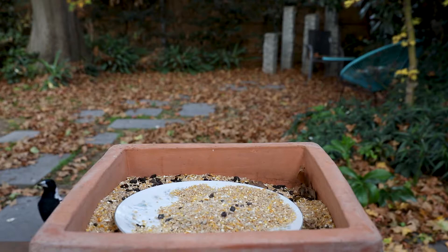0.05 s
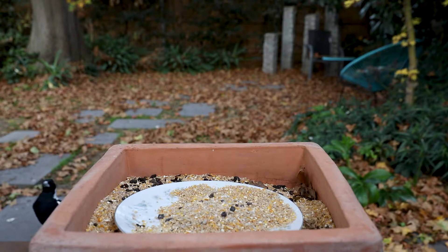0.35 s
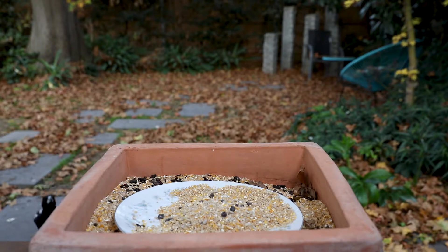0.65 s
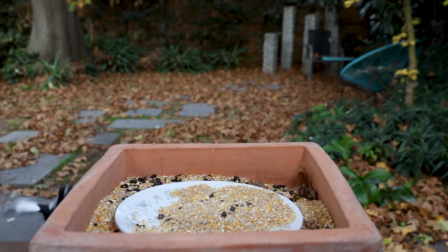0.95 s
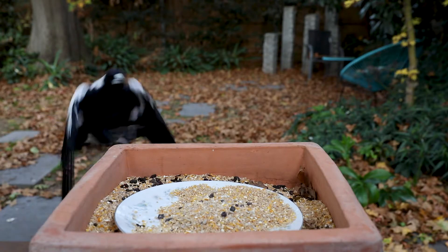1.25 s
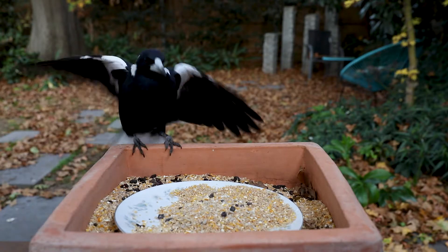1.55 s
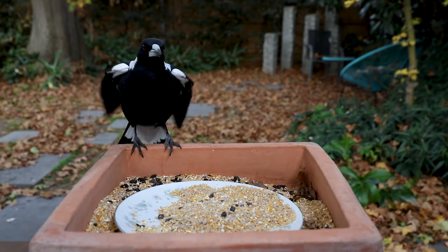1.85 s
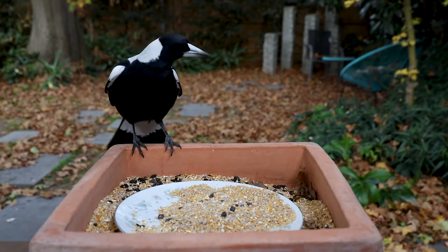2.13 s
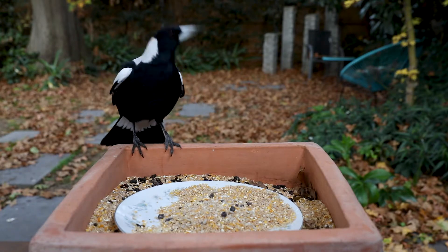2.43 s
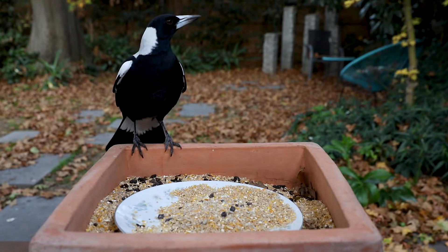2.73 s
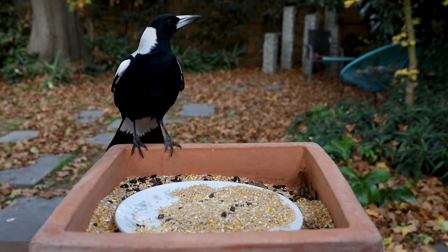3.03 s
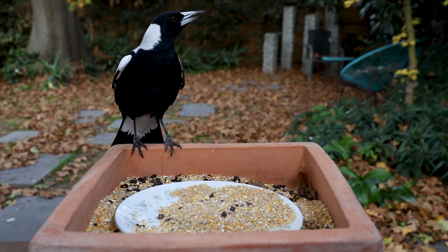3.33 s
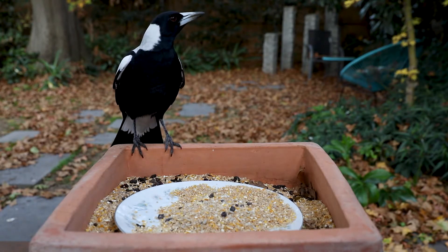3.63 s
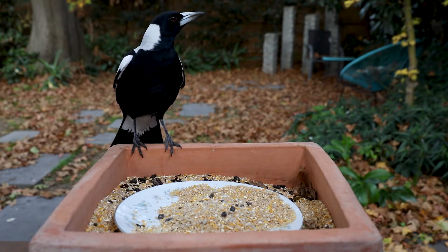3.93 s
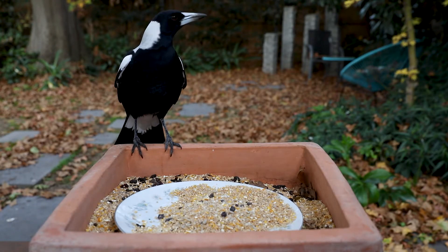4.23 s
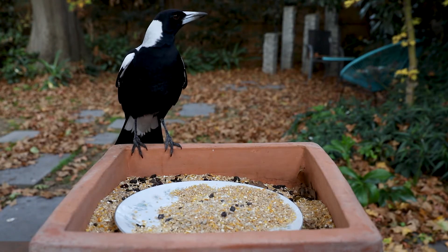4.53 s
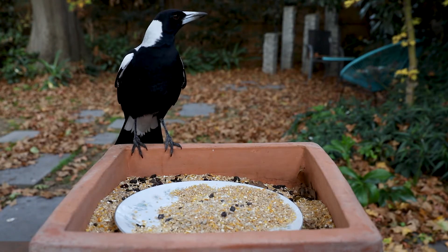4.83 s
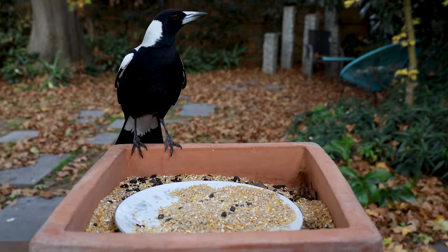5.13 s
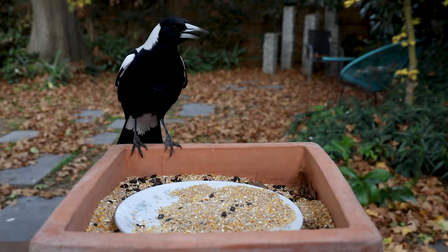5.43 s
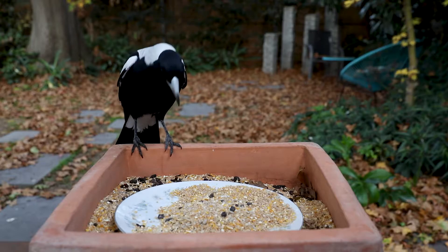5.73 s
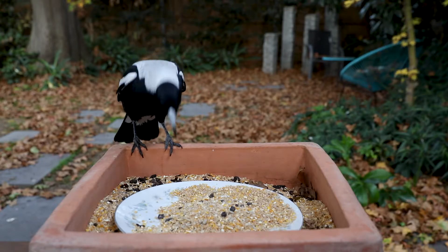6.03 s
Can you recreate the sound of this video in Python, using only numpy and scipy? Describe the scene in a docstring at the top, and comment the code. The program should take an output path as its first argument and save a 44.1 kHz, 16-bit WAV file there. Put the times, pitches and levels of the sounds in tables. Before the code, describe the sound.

A magpie calls in a quiet garden. Two softer, harsh squawks come first, each falling in pitch and ending in a short whistle, with faint wing swishes and claw scrapes between them. Louder squawks follow, a quick pair and then three in a row. Dry leaves rustle and a few dull knocks sound faintly in the gaps. The calls are fairly close, with a slight echo over a low outdoor hush.

```python
"""Magpie squawks, harsh and falling, some in quick pairs, at a seed tray in a leafy garden.
Each is a syrinx tone shaken by a fast flutter and shaped by throat and beak; it cracks, and the high
ones flip into a clean whistle. Wings swish as the bird flies up; claws and dry leaves scrape, with dull
knocks and two thin squeaks. Behind: one faint far hoot, garden wall echo, outdoor hush."""
import sys
import numpy as np
from scipy import signal
from scipy.fft import rfft, irfft, next_fast_len
from scipy.io import wavfile
from scipy.ndimage import uniform_filter1d, map_coordinates

SR = 44100
rng = np.random.default_rng(int(sys.argv[2]) if len(sys.argv) > 2 else 0)


def wrap_up_sound(samples):
    """Save the sound to the file named by the first command line argument, as 16-bit audio."""
    columns = np.atleast_2d(samples).T
    # keep every value between -1 and 1, then stretch to whole-number steps
    tamed = np.clip(columns, -1, 1)
    steps = np.round(tamed * 32767).astype(np.int16)
    wavfile.write(sys.argv[1], SR, steps)


N = 272538
TIME_S = np.arange(N) / SR

# (start [s], crack [s], end [s], first pitch [Hz], pre-crack pitch [Hz], cracked pitch [Hz],
#  flutter [Hz], crack roughness [0-1], windpipe echo [0-1], attack [s], level [dB], end fade [dB],
#  fundamental [dB], harsh treble [dB])
SQUAWKS = [(0.314, .459, .51, 1090, 976.4, 845, 159.4, 0.9, 0.05, .16, -27, -8, -8.5, -8),
           (1.672, 1.81, 1.858, 1084, 995, 872, 155.8, 0.92, 0.05, 0.24, -23.5, -6, -10, -10.5),
           (3.13, 3.298, 3.366, 903, 699, 668, 160.9, 0.46, 0.3, 0.073, -19.5, 13, -13, -11),
           (3.443, 3.576, 3.614, 1105, 960.3, 834, 158.9, 0.82, 0.1, 0.12, -14.5, -2.5, -10, -9.5),
           (5.205, 5.343, 5.387, 1138, 997, 811, 161.6, 0.67, 0.09, 0.12, -14.5, 6.5, -11.5, -9),
           (5.423, 5.604, 5.655, 885, 706, 673.6, 160.4, 0.36, 0.1, 0.072, -16.5, 17.5, -15, -10),
           (5.777, 5.925, 5.96, 1107, 1009, 804, 162, 0.6, 0.1, 0.13, -15, -2.5, -11, -11)]
# throat resonances (frequency [Hz], gain [dB])
THROAT_DB = [(200, -46.5), (520, 0.5), (750, -5.5), (1100, 4.5), (1280, 4.5), (1560, 8.5), (2080, 12),
             (2500, 2), (3000, -1.5), (3400, -8), (3900, -0.5), (4600, -5.5)]
# open-beak radiation (frequency [Hz], gain [dB])
BEAK_DB = [(5400, -6), (6500, -7.5), (8500, -10.5), (10600, -9), (12000, -24.5), (13500, -27.5),
           (15500, -49.5)]
# (start [s], end [s], first pitch [Hz], last pitch [Hz], level [dB], swell [dB], roughness [0-1],
#  overtone lift [dB])
WHISTLES = [(0.504, 0.584, 2005, 1962, -22, -6, 0.11, -1), (1.854, 1.9, 1965, 1922, -30, -8, 0.18, 8),
            (1.911, 1.922, 1911, 1890, -21, -3, 0, -3), (2.052, 2.192, 2107, 1891, -32.5, 16, 0.18, 4.5),
            (2.165, 2.32, 1729, 1531, -39, -13, 0.86, 16.5),
            (3.612, 3.664, 1983, 1879, -11, 4.5, 0.12, 1.5), (5.377, 5.428, 2047, 1942, -12.5, 2, .08, 4),
            (5.957, 6.006, 2014, 1889, -12.5, 0, 0.2, 2.5)]
# partials 1-6 (level [dB])
WHISTLE_PARTIALS_DB = [-2, -21, -32, -33.5, -33, -43.5]
# claws and leaves, and a feather rustle as the bird bends at 5.99 s (start [s], level [dB], crisp part [dB],
# rise [s], decay [s])
SCRAPES = [(.02, -53.5, -13, 0.011, .05), (0.101, -58, -12, 0.01, 0.072), (0.246, -60, -38, 0.0033, 0.057),
           (1.349, -52, -3, 0.0071, 0.11), (1.485, -68.5, 6, 0.0068, 0.69), (1.592, -64, 12.5, .001, 0.025),
           (2.522, -53.5, -11, 0.007, 0.12), (2.564, -57, 10.5, 0.0024, 0.13),
           (2.922, -48.5, -19, 0.0014, 0.084), (3.984, -50, -17, 0.03, 0.19),
           (4.188, -51.5, -5.5, 0.0021, 0.15), (4.301, -51, -12, 0.0037, 0.085),
           (4.399, -55, -7.5, 0.011, 0.1), (4.461, -56, -10.5, 0.0062, 0.086), (5.99, -50, 6, 0.012, 0.57)]
# dull part of a scrape (frequency [Hz], gain [dB])
SCRAPE_BODY_DB = [(80, -44), (150, -23), (350, -10), (700, -1.5), (1400, 2), (2500, -5), (4000, -15.5),
                  (8000, -38)]
# crisp part of scrapes, also feathers (frequency [Hz], gain [dB])
CRISP_DB = [(100, -67), (1000, 9.5), (3000, 4), (5000, -2), (7000, 4), (10500, 4), (12500, -2),
            (15500, -23)]
# wings (peak time [s], level [dB], rise [s], decay [s])
SWISHES = [(.996, -58, 0.034, 0.14), (1.198, -60, 0.033, 0.18), (1.294, -66, .04, 0.38),
           (5.12, -55, 0.028, 1)]
# (start [s], level [dB])
KNOCKS = [(0.103, -53), (2.374, -55.5), (2.55, -58.5), (2.942, -53)]
# two squeaks, one hoot (start [s], pitch [Hz], level [dB], length [s], waver [fraction of pitch])
FAINT_TONES = [(1.378, 9860, -58.5, 0.029, 0.032), (1.426, 6660, -55.5, 0.03, 0.12),
               (5.984, 383.6, -65.5, 0.27, 0.039)]
# garden echo of the calls (time [s], level [dB])
CALL_ECHO_DB = [(.4, -9), (1.8, -7), (2.2, -3), (3.2, -13.5), (3.6, -11.5), (5.9, -13)]
# garden reverberation (frequency [Hz], T60 [s])
GARDEN_T60_S = [(500, .42), (1350, 0.39), (2000, 0.4), (5000, 0.36), (10000, 0.35), (15000, 0.054)]
# outdoor noise spectrum (frequency [Hz], relative density [dB])
HUSH_SPECTRUM_DB = [(30, -25.5), (62, -20), (88, -36.5), (130, -12.5), (190, -11), (280, -4), (450, -4.5),
                    (850, 0.5), (1600, -4), (2500, -8), (3400, -16.5), (5000, -23), (11000, -21.5),
                    (15500, -28)]


def squawks(crack_s=.018, beak_close_s=.023, low_sag_db=10, crack_dip_db=5.5, hiss_db=-12, lead_rad=1.0):
    """One side of the syrinx sings; flutter in pitch and strength splits each partial into a cluster."""
    out = np.zeros(N)
    jitter, flutter_jitter, shimmer = wander(200), wander(70), wander(110)
    air = colour(rng.standard_normal(N), [(1200, -32), (3500, -5.5)])
    overtones = {k: undb(3.5 * wander(16) - 3 * (k < 6)) for k in range(3, 21)}
    for (start_s, crack_at_s, end_s, first_hz, last_hz, cracked_hz, flutter_hz,
         roughness, pipe_gain, attack_s, level_db, fade_db, low_db, harsh_db) in SQUAWKS:
        span = slice(int(start_s * SR), int(end_s * SR))
        t = TIME_S[span]
        progress = (t - start_s) / (end_s - start_s)
        chaos = roughness * np.clip((t - crack_at_s) / crack_s + .5, 0, 1)
        # pitch and flutter sag as pressure runs out
        pitch_hz = np.interp(t, [start_s, crack_at_s, crack_at_s + crack_s],
                             [first_hz, last_hz, cracked_hz])
        pitch_hz *= 1 + (.0098 + .036 * chaos) * jitter[span]
        unevenness = 1 + (.035 + .18 * chaos) * flutter_jitter[span]
        flutter_rad = phase_rad(flutter_hz * (1 - .1547 * progress) * unevenness)
        # slacker membrane, wider pitch swing
        swing = .062 * (.9 + .5 * progress) * np.cos(flutter_rad + lead_rad)
        phase = phase_rad(pitch_hz * (1 + swing))
        upper_phase = phase_rad(pitch_hz * (1 + .82 * swing))
        strength = (1 + .38 * np.cos(flutter_rad)) * undb((1.5 + chaos) * shimmer[span])
        upper = unit_rms(sum(gain[span] * (k * pitch_hz < SR / 2) * np.sin(k * upper_phase)
                             for k, gain in overtones.items()))
        rasp = (upper + undb(hiss_db) * air[span]) * np.sqrt(strength)
        low = throat(strength * np.sin(phase))
        main = throat(strength * np.sin(2 * phase))
        harsh = throat(windpipe(rasp, pipe_gain))
        # fundamental speaks first, treble last
        effort = np.sin(np.pi / 2 * np.clip((t - start_s) / attack_s, 0, 1))
        late_fade_db = fade_db * np.abs(progress) ** 8.4
        beak_open = np.clip((end_s - t) / beak_close_s, 0, 1)
        low *= effort ** .65 * undb(low_db - low_sag_db * progress)
        main *= effort ** 1.19 * undb(-late_fade_db - crack_dip_db * chaos)
        harsh *= effort ** 1.44 * undb(harsh_db - late_fade_db) * beak_open
        out[span] += (low + main + harsh) * undb(level_db) * gate(t, start_s, end_s, .0045)
    return out


def windpipe(x, echo_gain, resonance_hz=1923):
    """One round trip in the pipe; peaks at multiples of resonance_hz."""
    n = np.arange(len(x))
    return x + echo_gain * np.interp(n - SR / resonance_hz, n, x)


def throat(x, window_s=.096):
    """Throat and beak resonances; slow level changes evened out, flutter kept."""
    shaped = colour(x, list(THROAT_DB) + list(BEAK_DB))
    return shaped / np.sqrt(uniform_filter1d(shaped ** 2, int(window_s * SR)) + 1e-12)


def whistles(hiss_db=-15, fade_fraction=.14):
    """Syrinx locked in a near-pure falling tone; roughness adds tremble and air noise."""
    out = np.zeros(N)
    jitter, shimmer = wander(260), wander(110)
    air = colour(rng.standard_normal(N), [(300, -54), (2500, -28)] + list(BEAK_DB))
    for start_s, end_s, first_hz, last_hz, level_db, swell_db, roughness, lift_db in WHISTLES:
        span = slice(int(start_s * SR), int(end_s * SR))
        t, length_s = TIME_S[span], end_s - start_s
        progress = (t - start_s) / length_s
        pitch_hz = first_hz + (last_hz - first_hz) * progress
        phase = phase_rad(pitch_hz * (1 + .032 * roughness * jitter[span]))
        tone = sum(undb(partial_db + min((k - 1) / 2, 1) * lift_db) * np.sin(k * phase)
                   for k, partial_db in enumerate(WHISTLE_PARTIALS_DB, 1))
        voice = np.sqrt(2) * tone + undb(hiss_db) * roughness * air[span]
        gain = undb(level_db + swell_db * (progress - .5) + 2 * roughness * shimmer[span])
        out[span] += voice * gain * gate(t, start_s, end_s, fade_fraction * length_s)
    return out


def scrapes(body, crisp):
    """Claws and dry leaves, and a last feather rustle: bursts of dull and crisp grains."""
    return sum(undb(level_db) * burst(start_s, rise_s, decay_s) * (body + undb(crisp_db) * crisp)
               for start_s, level_db, crisp_db, rise_s, decay_s in SCRAPES)


def wings(crisp):
    """Feather swishes: soft swells of crisp grains."""
    return crisp * sum(undb(level_db) * burst(peak_s - rise_s, rise_s, decay_s)
                       for peak_s, level_db, rise_s, decay_s in SWISHES)


def knocks(centre_hz=526, rise_s=.0036, decay_s=.11):
    """Dull knocks: bursts of band noise."""
    band_db = [(centre_hz / 4, -30), (centre_hz, 0), (centre_hz * 4, -40), (15000, -70)]
    thud = colour(rng.standard_normal(N), band_db)
    return thud * sum(undb(level_db) * burst(start_s, rise_s, decay_s) for start_s, level_db in KNOCKS)


def squeaks_and_hoot():
    """Landing squeaks and a far hoot: wavering sines that swell and fade."""
    out, jitter = np.zeros(N), wander(650)
    for start_s, pitch_hz, level_db, length_s, waver in FAINT_TONES:
        tone = np.sqrt(2) * np.sin(phase_rad(pitch_hz * (1 + waver * jitter)))
        out += tone * undb(level_db) * gate(TIME_S, start_s, start_s + length_s, length_s / 2)
    return out


def garden_echo(x, delay_s=.006, build_s=.031):
    """Scattered reflections from ground, walls and shrubs; treble dies first."""
    t, hz = TIME_S[:SR], np.fft.rfftfreq(SR, 1 / SR)
    scatter = rfft(grains(spread_db=2.5)[:SR])
    response = np.zeros(SR)
    for band_hz, t60_s in GARDEN_T60_S:
        band = at_hz(hz, [(f, float(f == band_hz)) for f, _ in GARDEN_T60_S])
        response += irfft(scatter * band, SR) * undb(-60 * t / t60_s)
    response *= np.clip((t - delay_s) / build_s, 0, 1)
    return signal.fftconvolve(x, response / np.sqrt(np.sum(response ** 2)))[:N]


def hush(level_db=-63):
    """Far outdoor noise, swelling slightly."""
    noise = colour(rng.standard_normal(N), HUSH_SPECTRUM_DB)
    return noise * undb(level_db + .5 * wander(1) + .29 * wander(14))


def undb(db):
    """Decibels to gain."""
    return 10 ** (np.asarray(db) / 20)


def unit_rms(x):
    """Scale to rms 1."""
    return x / np.sqrt(np.mean(x ** 2) + 1e-18)


def phase_rad(hz):
    """Running phase of a frequency track."""
    return 2 * np.pi * np.cumsum(hz) / SR


def at_hz(hz, points):
    """Table lookup on a log-frequency axis."""
    points_hz, values = np.transpose(points)
    return np.interp(np.log(np.maximum(hz, 1)), np.log(points_hz), values)


def colour(x, spectrum_db):
    """Filter by (frequency [Hz], gain [dB]) points; rms 1."""
    size = next_fast_len(len(x))
    gain = undb(at_hz(np.fft.rfftfreq(size, 1 / SR), spectrum_db))
    return unit_rms(irfft(rfft(x, size) * gain, size)[:len(x)])


def wander(rate_hz):
    """Smooth noise up to about rate_hz; rms 1."""
    knots = rng.standard_normal(N // 4)[:int(2 * rate_hz * N / SR) + 4]
    return unit_rms(map_coordinates(knots, [TIME_S * 2 * rate_hz], order=2, mode="nearest"))


def grains(spread_db):
    """Dense clicks of unequal size, 16 samples each."""
    noise = rng.standard_normal(N)
    sizes = np.minimum(rng.exponential(size=N // 16 + 1), 5)
    return noise * undb(spread_db * np.repeat(sizes, 16)[:N])


def gate(t, start_s, end_s, fade_s):
    """Window with sine-squared edges."""
    return np.sin(np.pi / 2 * np.clip(np.minimum(t - start_s, end_s - t) / fade_s, 0, 1)) ** 2


def burst(start_s, rise_s, decay_s):
    """Linear rise, then 40 dB down per decay_s."""
    age_s = np.maximum(TIME_S - start_s, 0)
    fall_nepers = np.log(100) * np.maximum(age_s - rise_s, 0) / decay_s
    return np.minimum(age_s / rise_s, 1) * np.exp(-np.minimum(fall_nepers, 20))


def scene(faint_echo_db=-9):
    """Calls, faint sounds, their echo and the hush; mono."""
    calls = squawks() + whistles()
    body = colour(grains(spread_db=.91), SCRAPE_BODY_DB)
    crisp = colour(grains(spread_db=1.6), CRISP_DB)
    faint = scrapes(body, crisp) + wings(crisp) + knocks() + squeaks_and_hoot()
    call_echo_db = np.interp(TIME_S, *np.transpose(CALL_ECHO_DB))
    echo = garden_echo(calls * undb(call_echo_db) + faint * undb(faint_echo_db))
    return (calls + faint + echo + hush())[None]


def record(dry):
    """Microphone passband, 20 Hz to 15.8 kHz."""
    highpass = signal.butter(1, 20, "high", fs=SR, output="sos")
    lowpass = signal.ellip(10, .2, 80, 15800, fs=SR, output="sos")
    return signal.sosfilt(lowpass, signal.sosfilt(highpass, dry))


dry = scene()
out = record(dry)
wrap_up_sound(out)
```